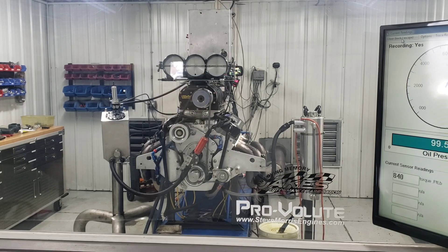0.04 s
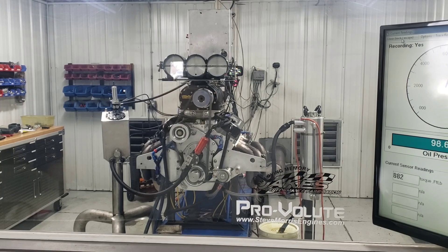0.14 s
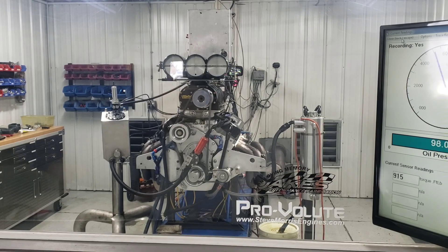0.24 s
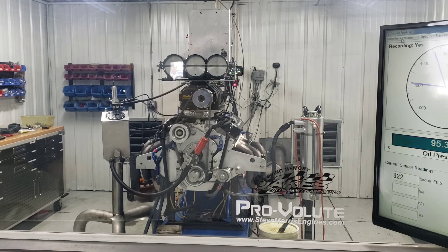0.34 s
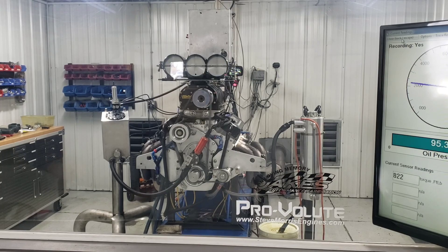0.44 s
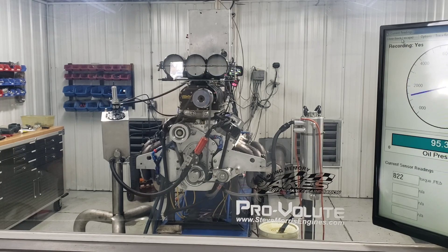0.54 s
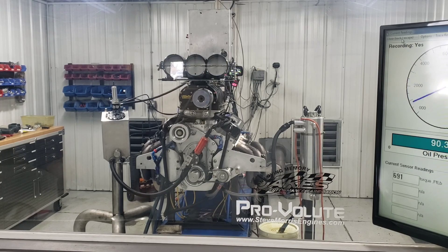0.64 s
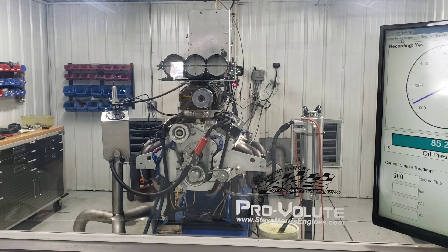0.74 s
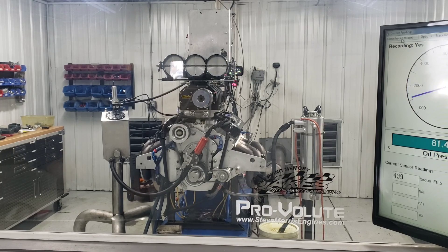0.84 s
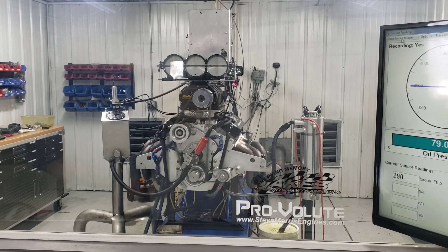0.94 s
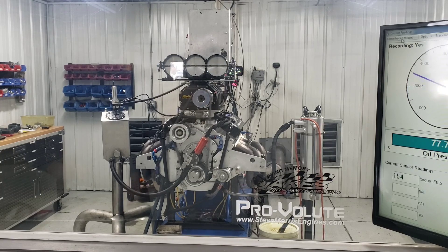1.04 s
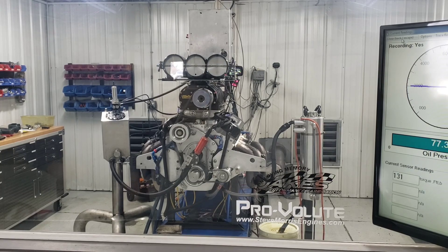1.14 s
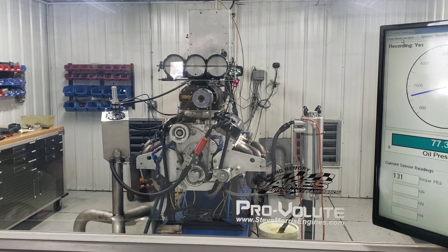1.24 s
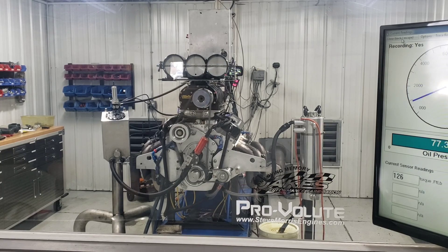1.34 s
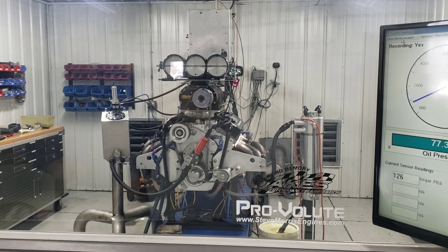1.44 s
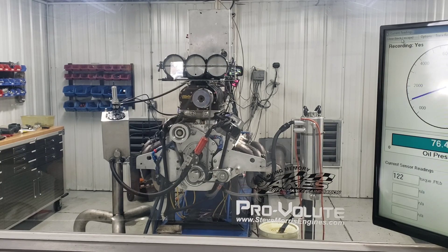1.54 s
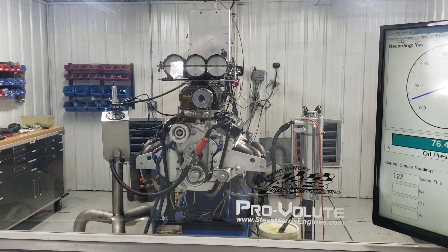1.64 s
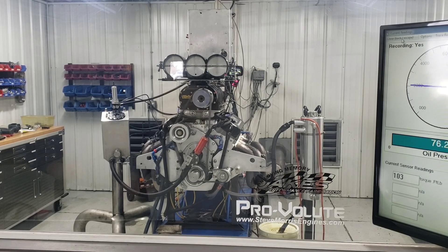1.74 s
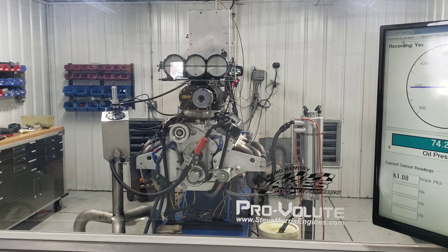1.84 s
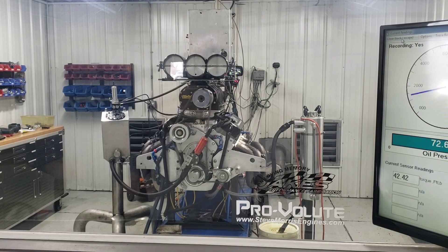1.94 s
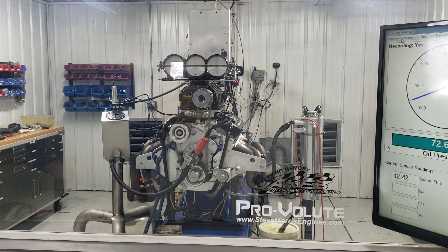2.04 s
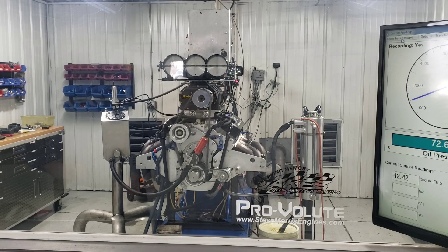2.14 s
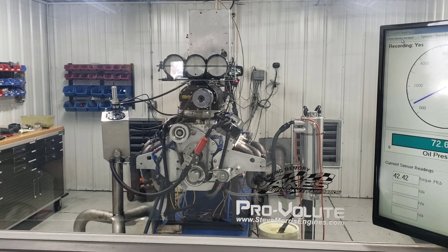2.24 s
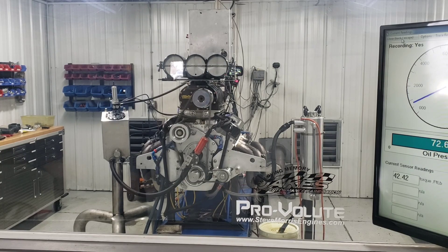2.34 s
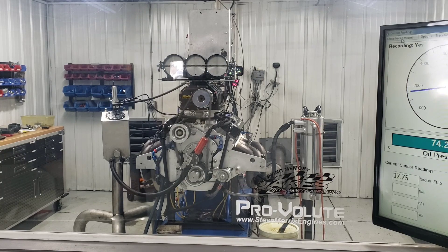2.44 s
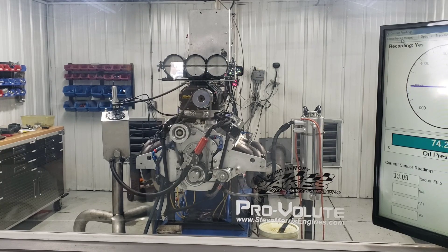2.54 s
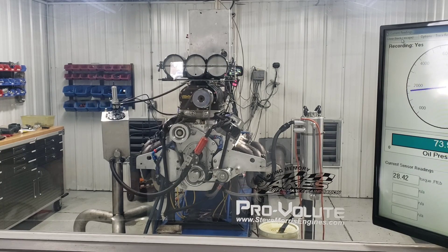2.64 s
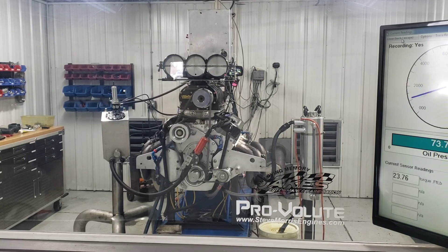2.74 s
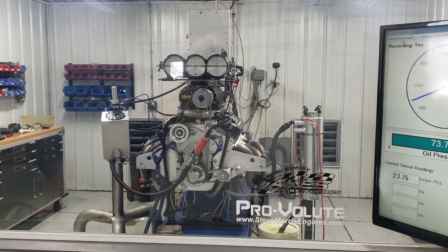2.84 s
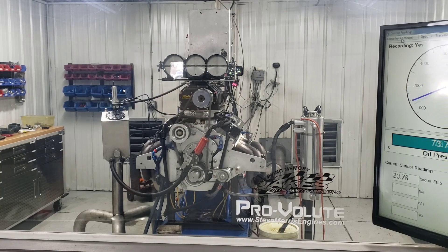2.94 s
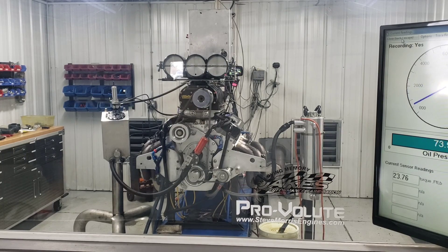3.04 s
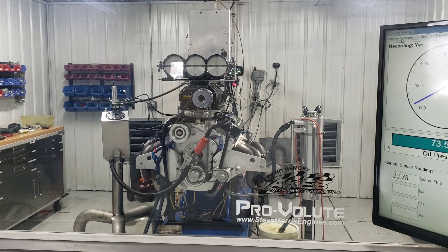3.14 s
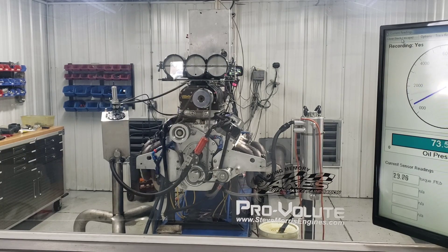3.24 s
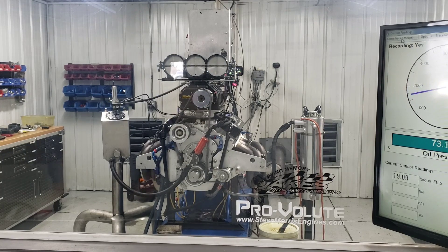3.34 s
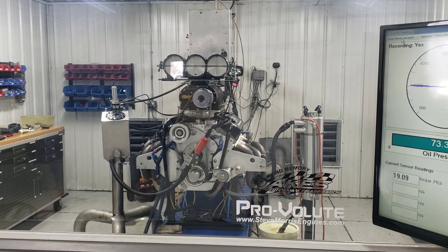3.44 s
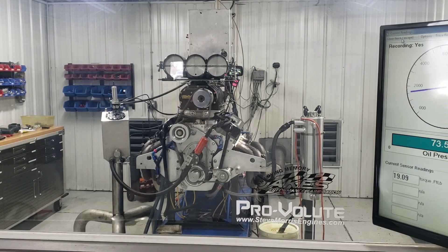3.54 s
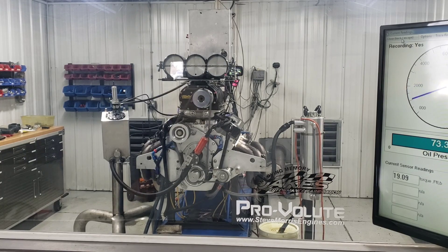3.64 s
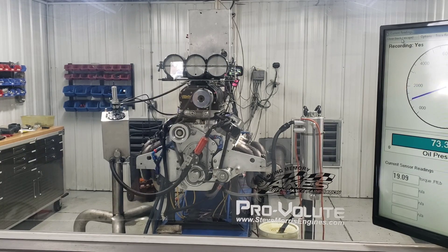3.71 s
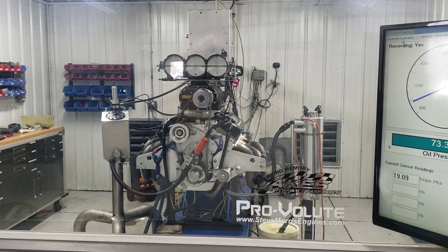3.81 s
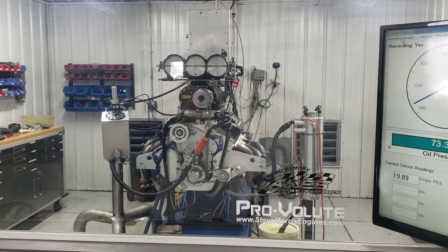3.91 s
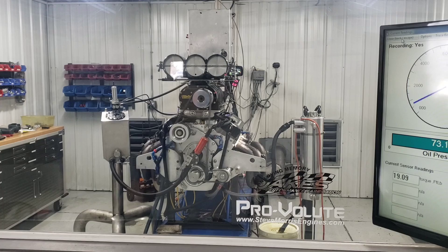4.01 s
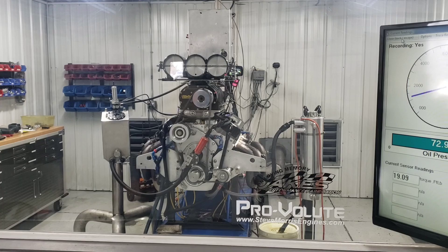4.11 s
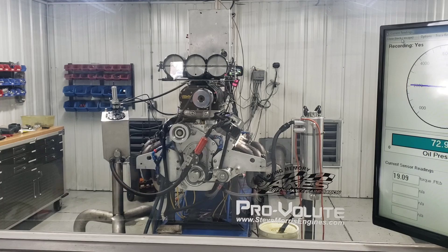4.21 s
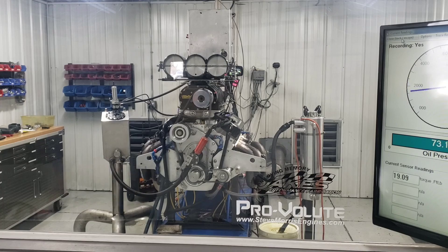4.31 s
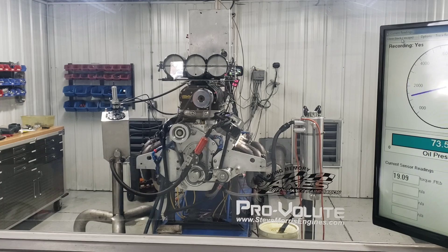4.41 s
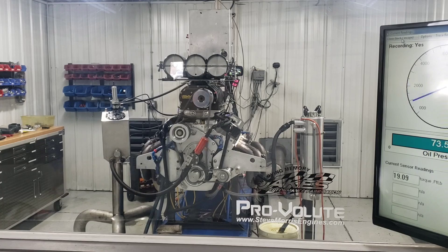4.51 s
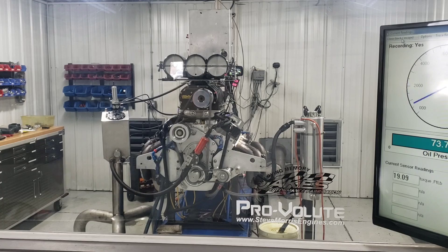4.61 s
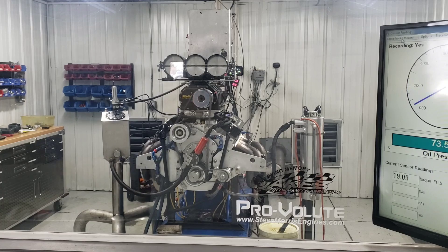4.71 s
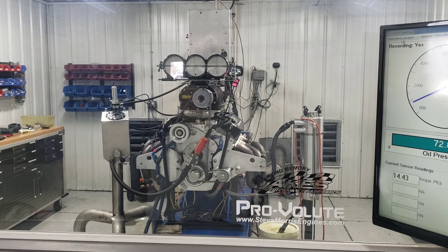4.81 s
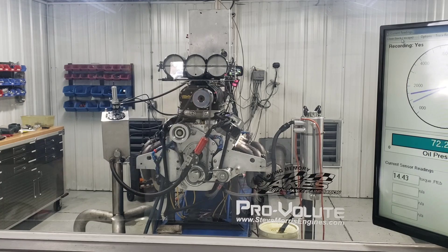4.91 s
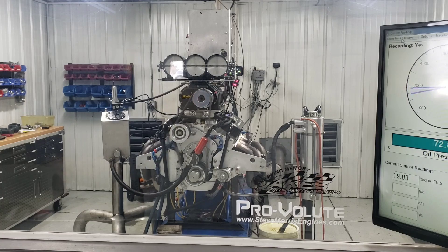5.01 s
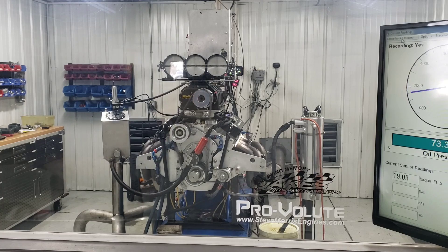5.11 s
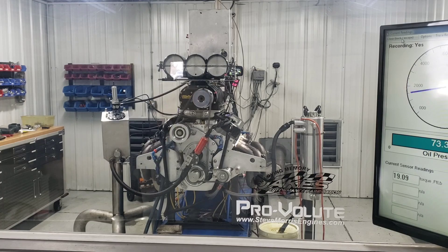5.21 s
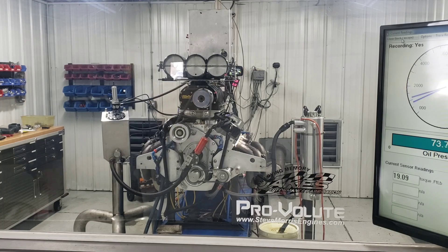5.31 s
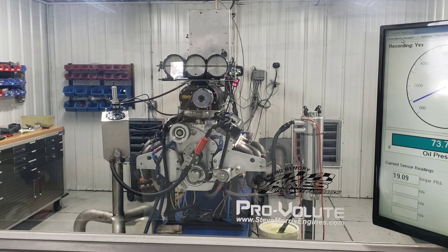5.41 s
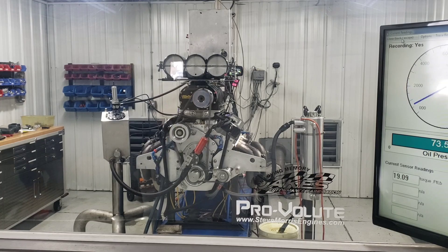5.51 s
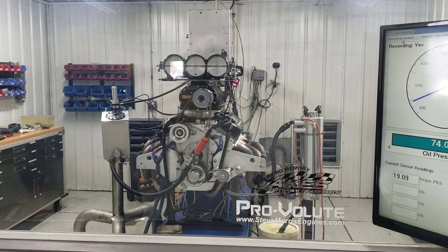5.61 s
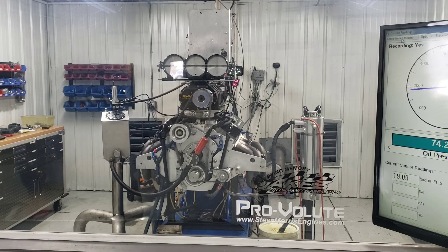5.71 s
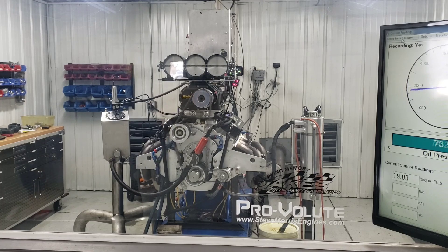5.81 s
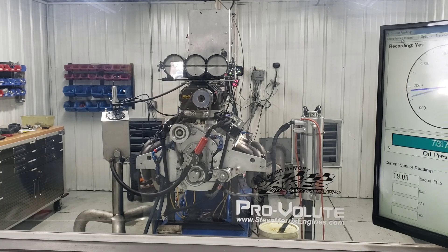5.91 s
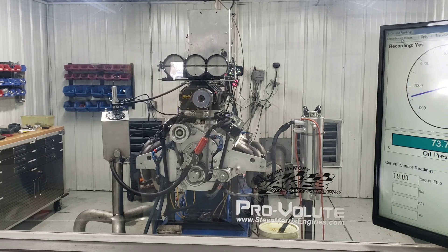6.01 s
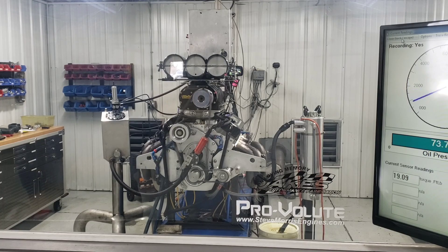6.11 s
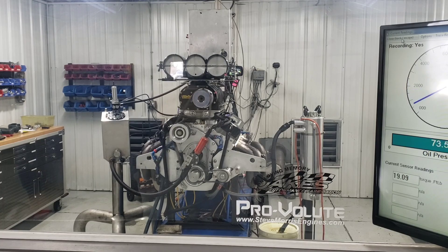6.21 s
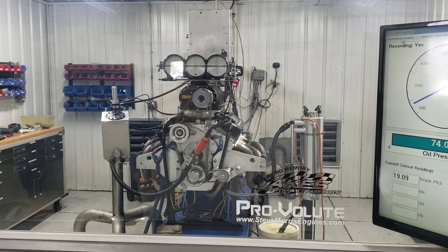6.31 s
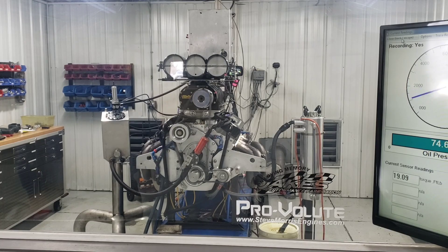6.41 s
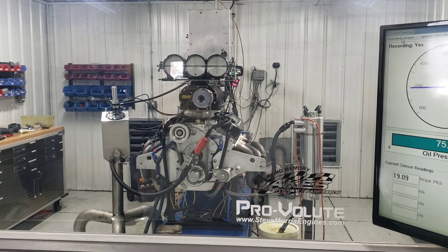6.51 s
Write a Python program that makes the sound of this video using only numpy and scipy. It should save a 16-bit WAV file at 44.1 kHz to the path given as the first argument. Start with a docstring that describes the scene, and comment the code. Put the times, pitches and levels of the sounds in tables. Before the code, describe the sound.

A big supercharged engine drops off a high-speed pull, its ringing tones dying fast, then settles into a loping, surging rough idle in a hard-walled room.

```python
"""A supercharged eight-cylinder engine comes off a high-speed pull in a hard-walled test cell; its tones die away.
Then the idle hunts up and down about every 0.8 s, heard by two microphones.
Uneven firing pulses and gas blasts, through resonant peaks, make the growl and rasp; sine tones at three
standing waves of the cell boom. Shaped noise makes the rumble, blower and intake hiss, which swell with every surge,
and sudden intake gulps; a thin sine whistle runs underneath."""
import sys
import numpy as np
from scipy import signal
from scipy.fft import rfft, irfft
from scipy.io import wavfile
from scipy.ndimage import uniform_filter1d

SR = 44100
rng = np.random.default_rng(int(sys.argv[2]) if len(sys.argv) > 2 else 0)


def wav_out(sig):
    """Save sig, one row per channel (or a flat mono array), as 16-bit PCM at SR to the path in sys.argv[1]."""
    wavfile.write(sys.argv[1], SR, np.round(np.clip(np.atleast_2d(sig).T, -1, 1) * 32767).astype(np.int16))


N = 288855
TIME = np.arange(N) / SR
BINS = np.arange(N // 2 + 1) * SR / N  # Hz

# How the murmur between surges moves, low after the pull. Each row: time in seconds, level offset in dB.
LULL_LEVEL = [(0, -14), (.6, -13), (1.3, -16.5), (2.05, -9), (2.4, 3), (3.2, 0.5), (6.55, 5)]


def undb(db):
    """Decibels to gain."""
    return 10 ** (np.asarray(db) / 20)


def unit(x):
    """Scale to rms 1."""
    return x / np.sqrt(np.mean(x ** 2))


def curves(table):
    """Columns of a timed table, one value per sample."""
    s, *columns = np.transpose(table)
    return [np.interp(TIME, s, column) for column in columns]


def over_hz(points):
    """A (Hz, value) list on every spectral bin, straight on a log axis."""
    hz, value = np.transpose(points)
    return np.interp(np.log(BINS + 1), np.log(hz), value)


def noise():
    """White noise."""
    return rng.standard_normal(N)


def walk(rate):
    """Random levels held 1 / rate seconds and slewed twice, scaled to rms 1."""
    hold = int(SR / rate)
    steps = np.repeat(rng.standard_normal(N // hold + 1), hold)
    smooth = uniform_filter1d(uniform_filter1d(steps, hold), hold)
    return unit(smooth[:N])


def power_sum(db):
    """Levels of unrelated parts, added as power."""
    return 10 * np.log10(np.sum(10 ** (db / 10), axis=0))


def resonance_db(hz, width_hz, peak_db):
    """Bell-shaped resonance over the spectral bins."""
    return peak_db / (1 + (2 * (BINS - hz) / width_hz) ** 2)


def cell(source, gain):
    """The two microphones share part of a diffuse source, the left one a little early; the rest is unrelated."""
    # How alike the two microphones are. Each row: frequency in Hz, correlation.
    alikeness = [(30, 0.92), (60, 0.8), (200, 0.88), (350, 1), (520, 0.48), (800, 0.18), (1500, 0.25),
                 (2500, 0.078), (15000, 0.12)]
    left_lead_s = 20 / SR
    shared, left, right = (rfft(source()) for _ in range(3))
    alike = np.clip(over_hz(alikeness), 0, 1)
    late = np.exp(-2j * np.pi * BINS * left_lead_s)
    common = np.sqrt(alike) * shared * np.array([np.ones_like(late), late])
    apart = np.sqrt(1 - alike) * np.array([left, right])
    return unit(irfft((common + apart) * gain, N))


def surging(column, climb_db, fade_db_per_s, lull_db, shut_db, hold_s, shut_fade_db_per_s, lag_s=0.0):
    """Level of one layer: it fades from the pull, then climbs through each build-up and fades after the peak."""
    # The idle surges. Each row: build-up start in seconds, peak in seconds, then peak level in dB of
    # growl, rasp, rumble, blower and intake (columns 2 to 6).
    surges = np.array([(0.624, 0.923, -28.5, -36, -39.5, -30, -37),
                       (1.317, 1.668, -32.5, -38.5, -39, -34, -39.5),
                       (2.102, 2.416, -27, -35, -37, -29.5, -35.5),
                       (2.846, 3.253, -22.5, -31, -32, -24.5, -28),
                       (3.774, 4.075, -23.5, -30.5, -31, -24, -28),
                       (4.52, 4.92, -23.5, -31, -33, -24.5, -28.5),
                       (5.324, 5.66, -23.5, -31, -30, -25, -29), (6.057, 6.38, -24, -30, -32, -25.5, -30.5)])
    round_s = 0.083  # peaks are rounded over this time
    start, peak, peak_db = surges[:, :1], surges[:, 1:2], surges[:, column, None]
    since = TIME - peak - lag_s
    climb = climb_db * since / (peak - start)
    surge_levels = peak_db + np.where(since < 0, climb, -fade_db_per_s * since)
    pull_level = shut_db - shut_fade_db_per_s * np.maximum(TIME - hold_s, 0)
    lull_level = lull_db + curves(LULL_LEVEL)[0]
    total_db = power_sum(np.vstack([surge_levels, pull_level, lull_level]))
    return undb(uniform_filter1d(total_db, int(round_s * SR)))


def firings(rate_hz, timing=.05, scatter_db=2.5):
    """One pulse per cylinder, uneven in time and strength, and the phase within each firing."""
    # Uneven exhaust banks: relative level in dB of each cylinder, in firing order.
    cylinder_db = [-2.5, -1, 1, -12.5, -0.5, -2, 0.5, -5.5]
    turns = np.cumsum(rate_hz * (1 + timing * walk(60))) / SR
    at = np.flatnonzero(np.diff(np.floor(turns)))
    scatter = scatter_db * rng.standard_normal(len(at))
    pulses = np.zeros(N)
    pulses[at] = undb(np.resize(cylinder_db, len(at)) + scatter)
    return pulses, turns % 1


def exhaust(pulses, colour, pulse_db, steady):
    """Firings, each with a decaying turbulent gas blast, through resonant peaks."""
    # Resonant peaks in the exhaust sound. Each row: frequency in Hz, width in Hz, boost in dB.
    resonant_peaks = [(177, 35, 5), (240, 54, 3), (379, 14.6, 7.5), (461, 36, 2.5), (690, 120, 0.5)]
    blast_s = 0.0085  # decay time constant of the blast after a firing
    peaks_db = sum(resonance_db(*row) for row in resonant_peaks)
    keep = np.exp(-1 / (blast_s * SR))
    blast = unit(steady + unit(signal.lfilter([1], [1, -keep], pulses)))
    beat = undb(pulse_db) * unit(pulses - pulses.mean())
    return cell(lambda: beat + blast * noise(), undb(over_hz(colour) + peaks_db))


def growl(pulses, lumps):
    """Low exhaust growl of pulses and blasts, loping in random strong and weak lumps."""
    # Growl spectrum. Each row: frequency in Hz, relative density in dB per Hz.
    colour = [(88, -32), (150, -1), (168, -13), (243, -9.5), (307, -13), (371, -16), (500, -26.5),
              (650, -39), (1100, -120)]
    level = surging(2, climb_db=18.5, fade_db_per_s=66.5, lull_db=-40,
                    shut_db=-27, hold_s=0.15, shut_fade_db_per_s=106)
    return exhaust(pulses, colour, pulse_db=-4, steady=2.0) * level * lumps


def rasp(pulses, lumps):
    """Brighter exhaust rasp, mostly blast turbulence, lagging the surges and loping half as deep in dB."""
    # Rasp spectrum. Each row: frequency in Hz, relative density in dB per Hz.
    colour = [(250, -33.5), (420, -2.5), (665, 1), (715, -3), (1120, -5.5), (1240, -8.5), (1960, -16.5),
              (2400, -19), (3120, -48), (5280, -120)]
    level = surging(3, climb_db=19.5, fade_db_per_s=48.5, lull_db=-45,
                    shut_db=-24, hold_s=0.091, shut_fade_db_per_s=69, lag_s=0.05)
    return exhaust(pulses, colour, pulse_db=-13, steady=4.3) * level * np.sqrt(lumps)


def booms(rows, lull_db):
    """Level in dB of one standing wave: each boom swells and fades over a murmur."""
    s, db, swell, fade = np.array(rows).T[:, :, None]
    # swell and fade each span 20 dB
    shape = db - 20 * np.where(TIME < s, (s - TIME) / swell, (TIME - s) / fade)
    return power_sum(np.vstack([shape, lull_db + curves(LULL_LEVEL)[0]]))


def waves(rate_hz):
    """Standing waves boom as the firing rate sweeps past them; nearly the same at both microphones."""
    # Low, middle and upper standing wave: pitch in Hz.
    wave_hz = [90.9, 116.2, 135.4]
    # One list for each wave. Each row: peak in seconds, peak level in dB, swell in seconds, fade in seconds.
    wave_booms = [
        [(1.15, -43, .08, .2), (1.5, -36, 0.05, .1), (1.83, -36, .25, .15), (2.17, -37, 0.13, .3),
         (2.61, -23, 0.041, 0.11), (3.05, -29, 0.29, .4), (3.24, -24, .3, .2), (3.47, -24, .2, 0.051),
         (4.07, -21.5, 0.22, 0.059), (4.32, -22.5, .12, .06), (4.71, -22.5, 0.046, 0.029),
         (4.86, -24, 0.22, .06), (5.08, -24, .12, 0.29), (5.62, -19, 0.045, 0.16), (5.84, -22.5, 0.087, 0.094),
         (6.15, -30, 0.15, 0.29), (6.33, -16.5, .08, 0.078)],
        [(0., -33, .1, .4), (.25, -34, .3, 0.088), (.71, -32.5, 0.065, 0.6), (.88, -33, 0.37, .35),
         (1.62, -22.5, 0.16, 0.24), (2.37, -15, 0.14, 0.11), (2.53, -28, 0.22, .07), (3.05, -27.5, .05, .4),
         (3.24, -11, 0.17, 0.061), (3.54, -35, .15, .15), (4.07, -17.5, 0.27, .2), (4.71, -33, 0.056, 0.041),
         (4.9, -10, 0.17, 0.11), (5.57, -21.5, .12, .15), (5.69, -11.5, 0.096, 0.14), (5.84, -23, 0.28, 0.054),
         (6.26, -21, .12, .2), (6.38, -10, 0.059, .11)],
        [(.13, -24, 0.094, 0.18), (.89, -28, .15, 0.28), (1.04, -31, .2, 0.12), (1.5, -38, .06, .07),
         (1.65, -30.5, .1, 0.39), (1.8, -33, .3, .06), (2.47, -17, .13, 0.12), (3.18, -20, 0.078, 0.55),
         (3.3, -16.5, 0.18, 0.18), (4.12, -16, 0.22, .15), (4.72, -32.5, .3, .1), (4.87, -26, 0.13, .15),
         (5.04, -22, .1, .2), (5.62, -17, 0.047, 0.14), (5.78, -24, 0.083, .1), (6.38, -17, 0.098, .35)],
    ]
    # Murmur of each wave between booms: level in dB before the lull offset.
    murmur_db = [-41, -43, -40.5]
    drift, rate_pull = 0.01974, .08  # random pitch spread; share of the firing rate's offset that pitch follows
    cycle_db = 2  # the waves throb once per eight firings
    throb_db = cycle_db * np.cos(2 * np.pi * np.cumsum(rate_hz) / SR / 8)
    out = 0
    for hz, rows, lull_db in zip(wave_hz, wave_booms, murmur_db):
        pitch = hz * (1 + drift * walk(12)) + rate_pull * (rate_hz - hz)
        phase = 2 * np.pi * (np.cumsum(pitch) / SR + rng.random())
        level_db = booms(rows, lull_db) + 1.63 * walk(30) + throb_db
        out = out + np.sqrt(2) * undb(level_db) * np.sin([phase, phase - .2])
    return out


def pull():
    """Tones at and between multiples of the full-speed firing rate waver as they die, over a low exhaust note."""
    # Low exhaust note that dips, rises a little and sinks away.
    # Each row: time in seconds, pitch in Hz, level in dB.
    low_note = [(0, 194, -36), (.08, 168, -26), (.13, 160, -33), (.2, 165, -37), (.34, 174.5, -38),
                (.42, 167.5, -53), (.6, 149.8, -86)]
    # Tones ringing out. Each row: multiple of the firing rate, starting level in dB, 60 dB decay in seconds.
    ringing = [(1, -26, 0.51), (1.5, -41, .6), (1.955, -27, 0.58), (2, -22, 0.59), (5, -34, 1), (6, -32, 1),
               (7, -31, 1.0), (8, -33, 1.0), (10, -31, .9)]
    firing_hz, drift = 426.5, 0.0095  # drift: random pitch spread, narrower for high multiples
    note_hz, note_db = curves(low_note)
    out = undb(note_db) * np.sin(2 * np.pi * np.cumsum(note_hz) / SR)
    for multiple, db, t60 in ringing:
        pitch = multiple * firing_hz * (1 + drift * walk(38.9) / np.sqrt(multiple))
        turns = np.cumsum(pitch) / SR
        waver_db = 4.3 * np.array([walk(42), walk(39.0)])
        tone = np.sin(2 * np.pi * np.array([turns, turns - .15]))
        out = out + undb(db - 60 * TIME / t60 + waver_db) * tone
    return out


def hiss(colour, phase, chop, flicker_db):
    """Rushing air: shaped noise, its strength rippled once per firing and flickering."""
    flow = (1 + chop * np.cos(2 * np.pi * phase)) * undb(flicker_db * walk(15))
    return cell(lambda: flow * noise(), undb(over_hz(colour)))


def patchy(x, lo_hz, count, flicker_db):
    """Quarter-octave bands flicker at random, each on its own."""
    band_octaves = 1 / 4
    spectrum = rfft(x)
    place = np.clip(np.log2((BINS + 1) / lo_hz) / band_octaves, 0, count - 1)
    out = 0
    for k in range(count):
        band = irfft(spectrum * np.clip(1 - np.abs(place - k), 0, 1), N)
        out = out + band * undb(flicker_db * walk(20))
    return unit(out)


def blower(phase):
    """Broad supercharger hiss that swells with every surge."""
    # Blower spectrum. Each row: frequency in Hz, relative density in dB per Hz.
    colour = [(1000, -18), (1700, -15), (1950, -14), (2280, -13), (3040, -8.5), (4270, -8.5), (5090, -6.5),
              (5660, 1), (7180, -27.5), (7600, -25), (9880, -38), (16700, -120)]
    air = patchy(hiss(colour, phase, chop=0.043, flicker_db=0.11), 1494, count=10, flicker_db=1.5)
    return air * surging(5, climb_db=20, fade_db_per_s=43, lull_db=-43,
                         shut_db=-17, hold_s=0.11, shut_fade_db_per_s=55)


def sizzle(phase):
    """High intake hiss that peaks just ahead of each surge and fades fast."""
    # Sizzle spectrum. Each row: frequency in Hz, relative density in dB per Hz.
    colour = [(4120, -19.5), (7000, -7), (7290, -14), (7850, -7.5), (8620, -12), (9530, 0.5), (9960, 2),
              (13300, -15), (15100, -12), (15600, -24)]
    air = patchy(hiss(colour, phase, chop=0.049, flicker_db=0.28), 7550, count=5, flicker_db=1.5)
    return air * surging(6, climb_db=23, fade_db_per_s=98, lull_db=-53.5,
                         shut_db=-26.5, hold_s=.04, shut_fade_db_per_s=92, lag_s=-.008)


def gulps(phase):
    """A cylinder catches and the intake gulps: bursts of air noise start at once and die exponentially."""
    # Each row: start in seconds, peak level in dB.
    gulp_rows = np.array([(2.1585, -53), (2.8504, -43), (2.9427, -40), (3.2037, -28), (3.8072, -38),
                          (3.9015, -35.5), (4.5529, -41.5), (4.6205, -39), (5.3323, -48), (5.3986, -43),
                          (6.2, -45)])
    # Gulp spectrum. Each row: frequency in Hz, relative density in dB per Hz.
    colour = [(2500, -40), (5000, 1), (7300, -11), (8600, -11), (9900, 0), (11500, -7), (13300, -11),
              (15600, -18)]
    t60_s = 0.45
    since = TIME - gulp_rows[:, :1]
    decay = (since > 0) * undb(-60 * np.abs(since) / t60_s)
    envelope = np.sum(undb(gulp_rows[:, 1:2]) * decay, axis=0)
    return hiss(colour, phase, chop=.12, flicker_db=1.8) * envelope


def rumble():
    """Deep shaped noise that rises and falls with the surges."""
    # Rumble spectrum. Each row: frequency in Hz, relative density in dB per Hz.
    colour = [(20, -34), (27, -23), (34, -17), (42, -2), (52, -6), (70, -3.5), (85, 1.5), (110, -43),
              (190, -91)]
    level = surging(4, climb_db=11, fade_db_per_s=30, lull_db=-40,
                    shut_db=-37, hold_s=.09, shut_fade_db_per_s=47)
    return cell(noise, undb(over_hz(colour))) * level


def whistle():
    """A thin sine tone that wavers in level and pitch."""
    # Each row: time in seconds, level in dB.
    whistle_level = [(0, -68), (1.2, -61), (2.2, -58.5), (2.8, -50.5), (4.6, -50.5), (6.55, -51.5)]
    pitch = 1954 * (1 + 0.00246 * walk(60))  # Hz
    phase = 2 * np.pi * np.cumsum(pitch) / SR
    return undb(curves(whistle_level)[0] + 2.3 * walk(53)) * np.sin([phase, phase - 1.5])


def scene():
    """All sources at the two microphones."""
    # Hunting speed. Each row: time in seconds, firing rate in Hz.
    speed = [(0, 183.2), (.2, 145), (.62, 88.3), (.98, 134.9), (1.38, 85.94), (1.74, 138.6), (2.08, 88.1),
             (2.47, 136), (2.85, 87.28), (3.3, 136.9), (3.75, 85.87), (4.14, 136.1), (4.5, 95.33),
             (5.0, 131.5), (5.3, 88.5), (5.73, 125.2), (6.05, 91.8), (6.45, 126.6), (6.55, 117.2)]
    rate_hz, = curves(speed)
    pulses, phase = firings(rate_hz)
    lumps = undb(2.0 * walk(28))  # random strong and weak lumps, shared by growl and rasp
    engine = growl(pulses, lumps) + rasp(pulses, lumps) + waves(rate_hz) + pull()
    air = blower(phase) + sizzle(phase) + gulps(phase)
    return engine + air + rumble() + whistle()


def record(dry):
    """The right microphone faces away and is duller; loud swells overload both; both ends of the band are cut."""
    # Balance of the microphone pair. Each row: frequency in Hz, left minus right in dB.
    balance = [(60, -1.5), (200, 0), (380, 2.5), (900, 1), (1300, 1.5), (1700, 8.5), (4500, 7), (5700, 11),
               (7000, 6), (8500, 10), (10000, 18.5), (11800, 8), (13000, 11)]
    square, cube = 0.12, 0.34  # overload of the microphones
    ratio = undb(over_hz(balance))
    right = np.sqrt(2 / (1 + ratio ** 2))
    port = undb(resonance_db(5890, 117, 1.5))  # port resonance of the left microphone
    heard = irfft(rfft(dry) * np.array([ratio * right * port, right]), N)
    # sum tones of the standing waves appear on the loudest swells
    heard = heard + square * heard ** 2 - cube * heard ** 3
    low_cut = signal.butter(N=2, Wn=30, btype="high", fs=SR, output="sos")
    top_cut = signal.ellip(14, .2, 70, 15700, fs=SR, output="sos")
    return signal.sosfilt(top_cut, signal.sosfilt(low_cut, heard))


dry = scene()
out = record(dry)
wav_out(out)
```